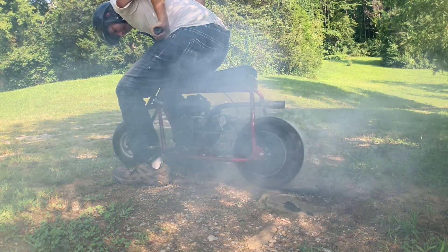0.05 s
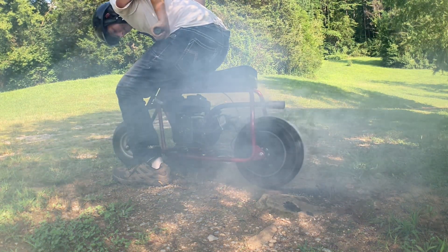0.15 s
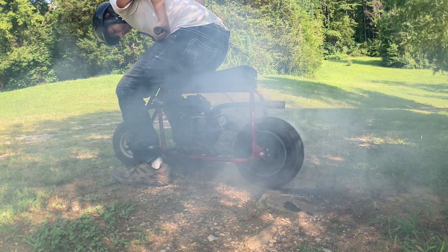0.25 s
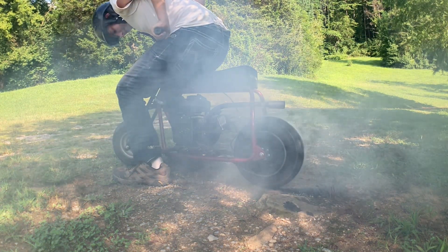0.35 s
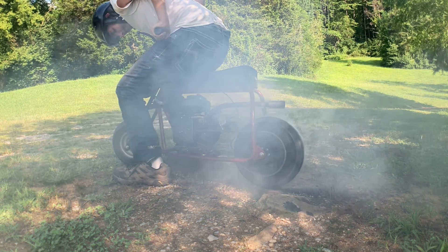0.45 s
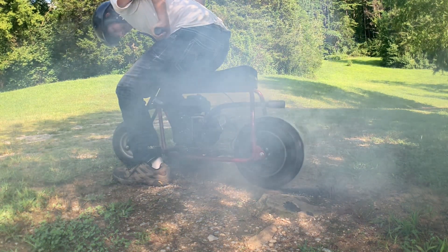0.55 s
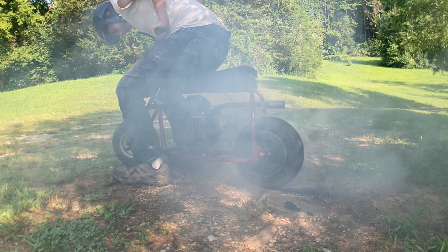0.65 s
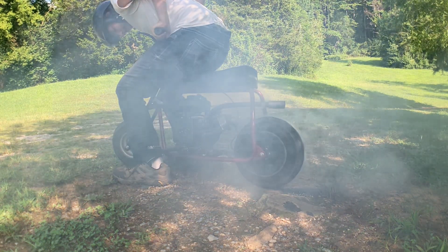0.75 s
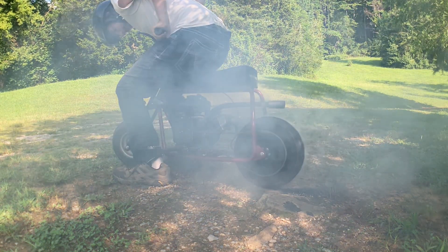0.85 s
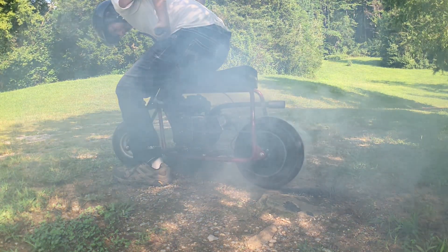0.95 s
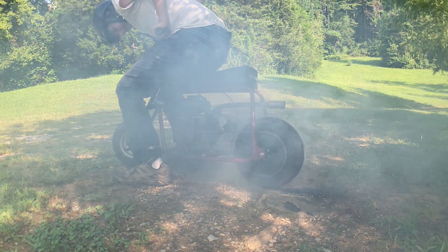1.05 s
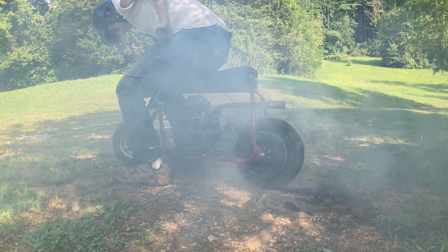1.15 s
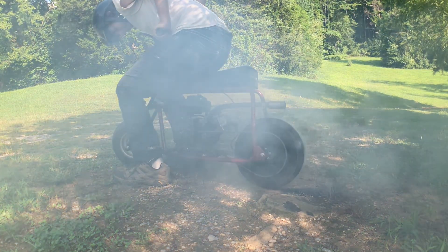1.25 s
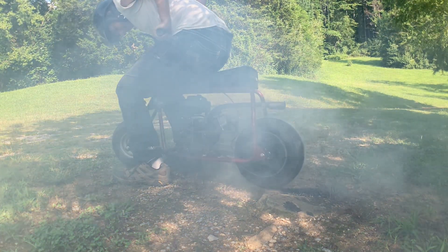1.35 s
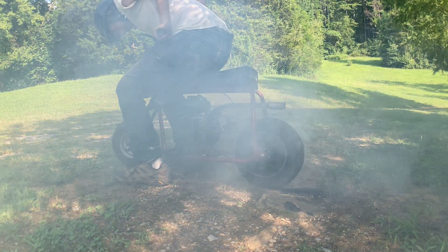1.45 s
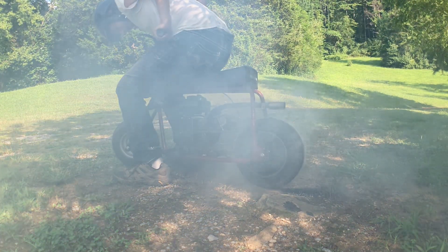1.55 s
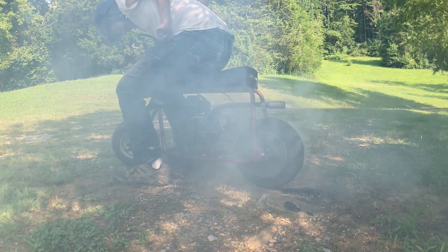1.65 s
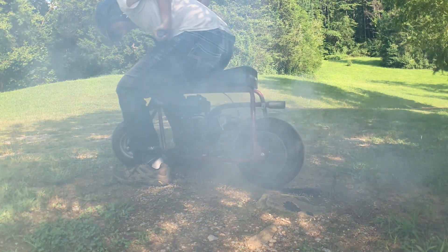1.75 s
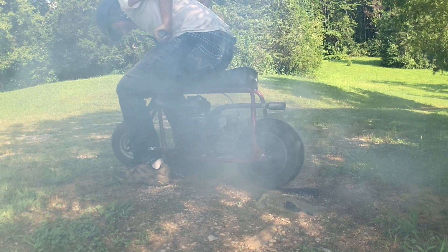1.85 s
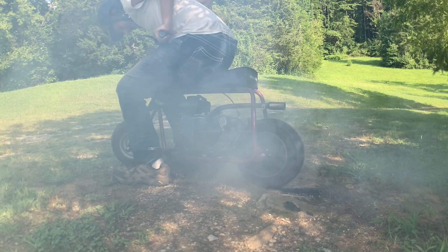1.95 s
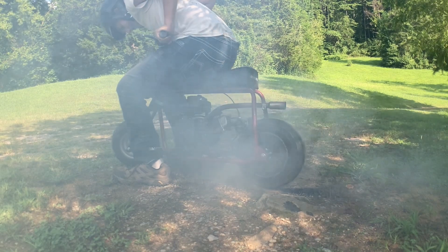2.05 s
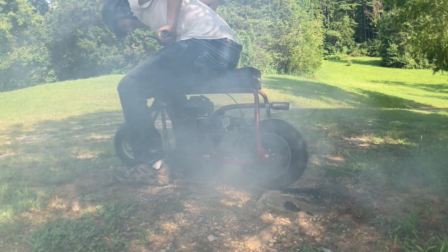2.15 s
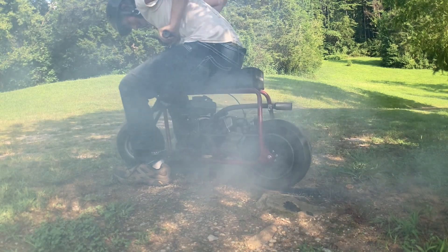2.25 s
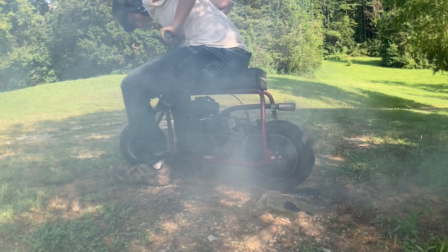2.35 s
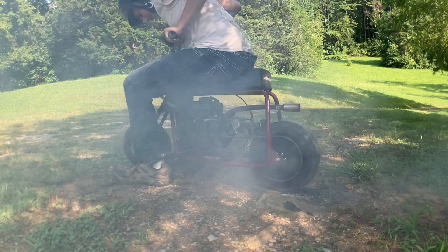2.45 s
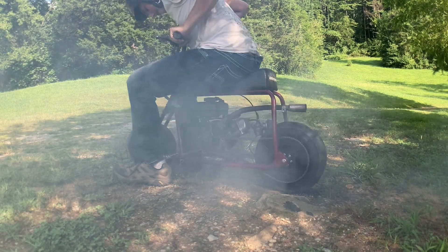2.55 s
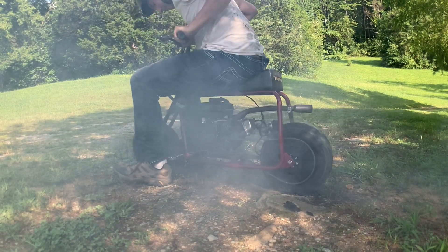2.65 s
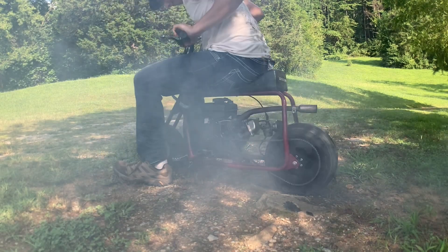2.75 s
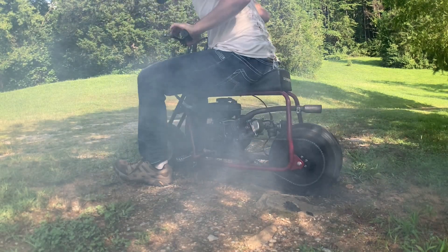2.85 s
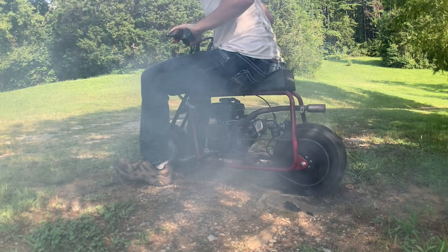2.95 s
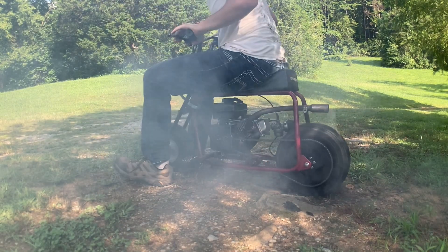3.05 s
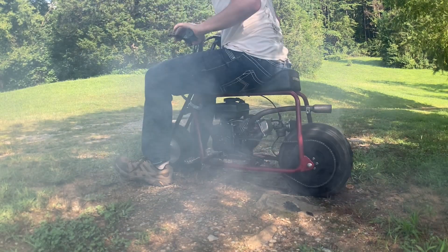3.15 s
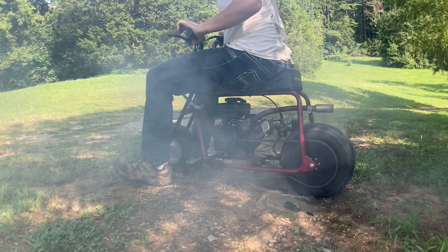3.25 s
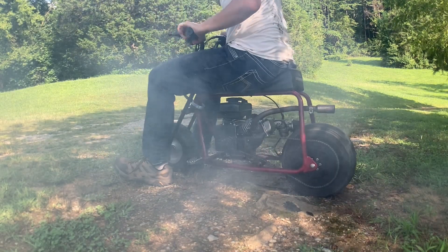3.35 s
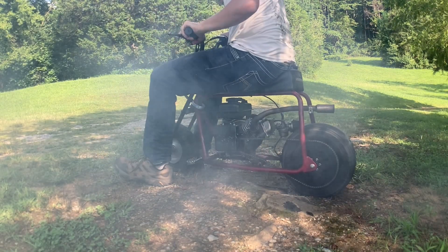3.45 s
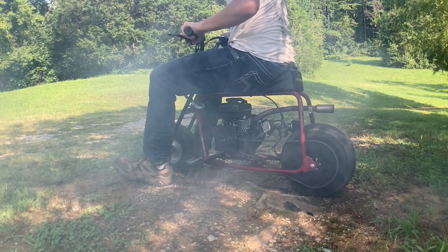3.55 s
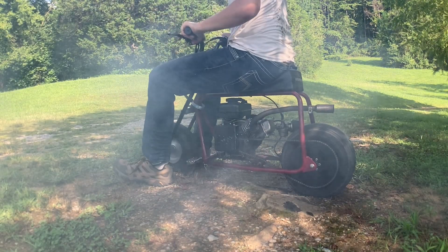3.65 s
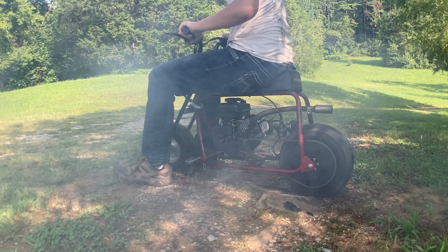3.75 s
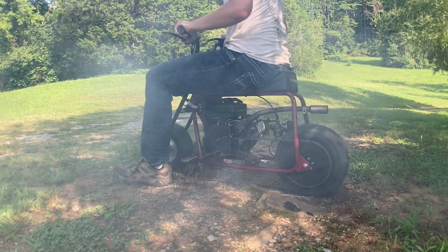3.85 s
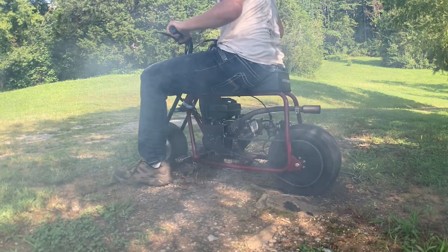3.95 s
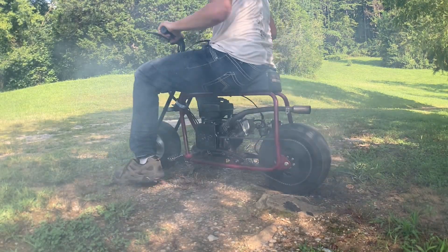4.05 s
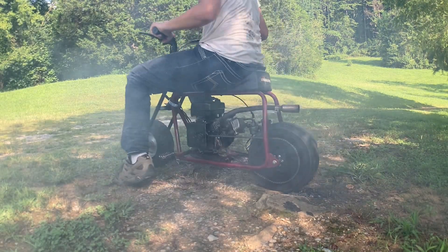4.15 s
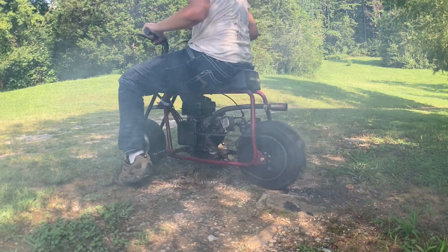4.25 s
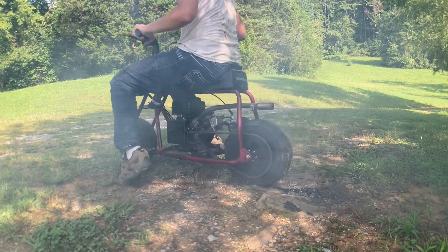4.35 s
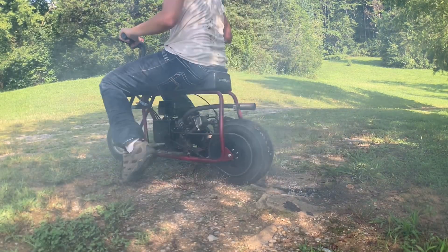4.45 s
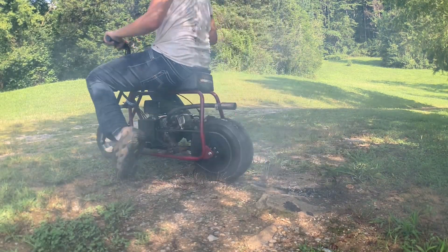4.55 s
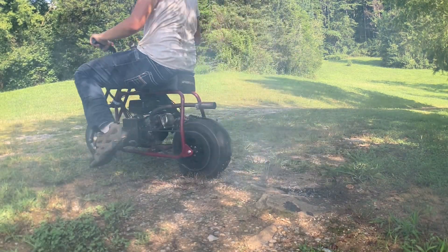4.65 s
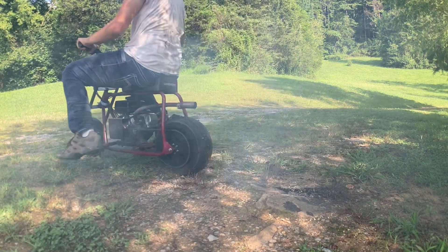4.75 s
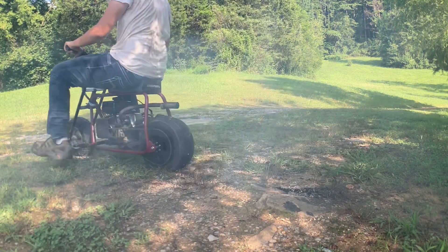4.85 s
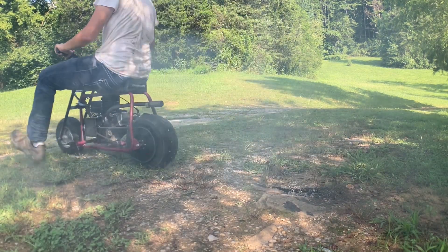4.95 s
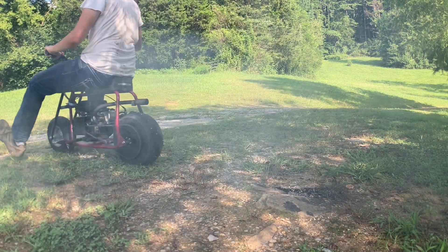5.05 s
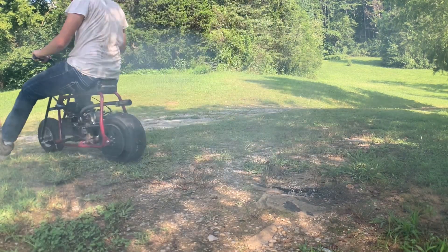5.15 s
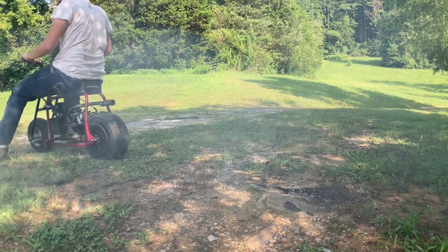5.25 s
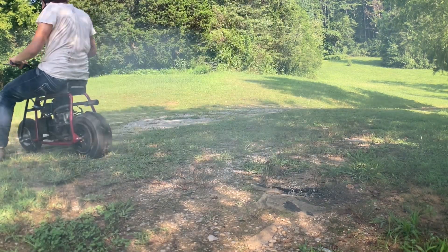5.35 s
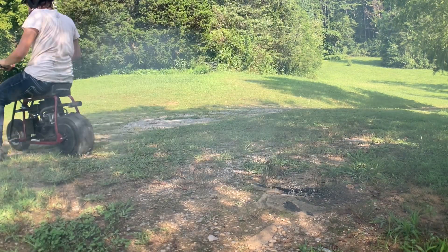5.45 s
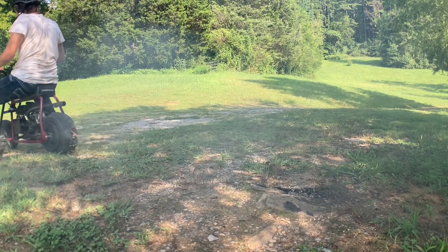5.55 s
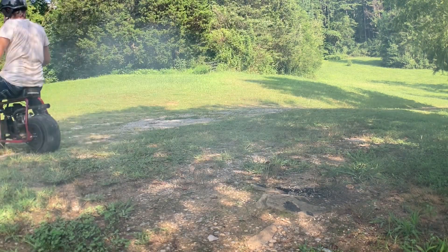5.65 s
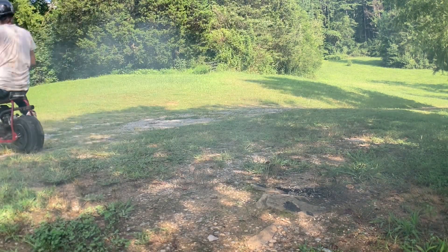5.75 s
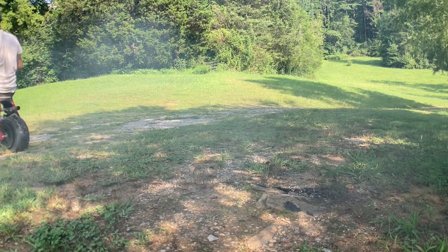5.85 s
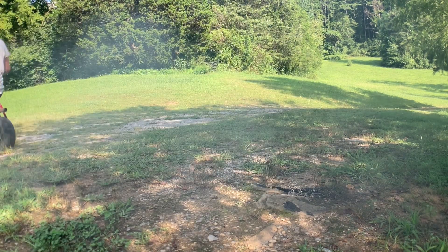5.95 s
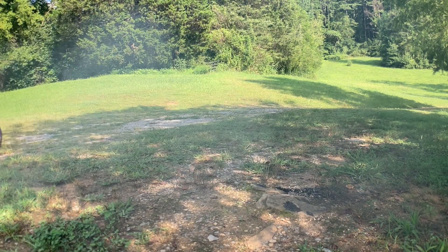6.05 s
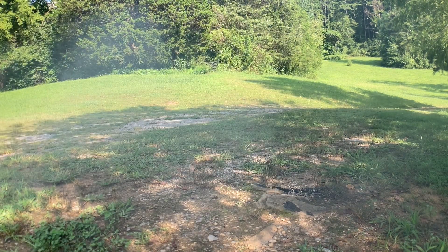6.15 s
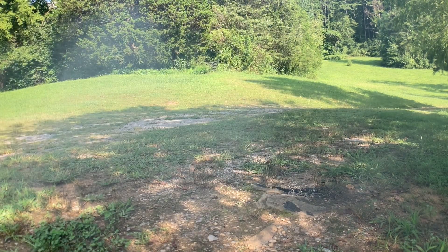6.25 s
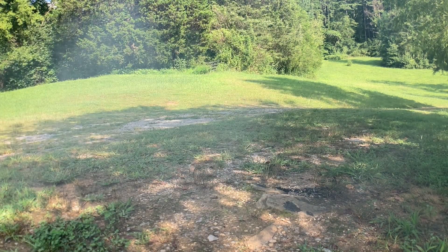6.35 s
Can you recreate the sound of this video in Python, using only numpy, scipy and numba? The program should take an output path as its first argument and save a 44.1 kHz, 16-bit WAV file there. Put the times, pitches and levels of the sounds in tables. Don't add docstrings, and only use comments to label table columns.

```python
import sys
import numpy as np
from scipy import signal
from scipy.fft import rfft, irfft
from scipy.io import wavfile
from scipy.ndimage import uniform_filter1d
from numba import njit

SR = 44100
rng = np.random.default_rng(int(sys.argv[2]) if len(sys.argv) > 2 else 0)


def decibels_to_gain(level_db):
    exponent = np.asarray(level_db, float) / 20
    return 10 ** exponent


def wrap_up_sound(samples):
    columns = np.atleast_2d(samples).T
    tamed = np.clip(columns, -1, 1)
    steps = np.round(tamed * 32767).astype(np.int16)
    wavfile.write(sys.argv[1], SR, steps)


N = 281790

# (time [s], four-stroke cycles per second [Hz])
CRANK = [(0.0, 47.817), (0.64, 49.286), (0.83, 47.98), (1.29, 25.15), (1.47, 25.909), (1.62, 23.037),
         (1.77, 23.609), (1.96, 18.861), (2.3, 14.361), (2.49, 13.153), (2.72, 13.291), (2.89, 21.66),
         (3.26, 15.823), (3.42, 23.182), (3.6, 18.657), (3.79, 23.884), (5.43, 23.543), (6.39, 22.758)]
# (frequency [Hz], width [Hz], level [dB])
CASING = [(2424, 190, -11), (2764, 112, -15), (4154, 50, -9.5), (4825, 50, -17), (5152, 75, -3.5),
          (5854, 83, -5), (7550, 370, -5.5), (8060, 350, -3), (11520, 320, -12)]
CLOSING_AT, INTAKE_AT = 0.2554, 0.5647


def exhaust(when, t):
    opens, closes, push, gulp = when(0), when(CLOSING_AT), when(0.34), when(INTAKE_AT)
    scatter = decibels_to_gain(0.32 * rng.standard_normal((4, len(opens))))

    blow_db = burn(opens)[0] + loss_db(opens)
    back_db = stroke_db(opens, (-90, 0, 0), (-11.5, 1.05))
    shut_db = stroke_db(opens, (-27, -1.1, -0.1), (-14.5, 0.4))
    push_db = stroke_db(opens, (-29.2, 4.2, 1.5), (-36, 2.5))
    gulp_db = stroke_db(opens, (-22, 1.6, 1.3), (-33, 0.6), far=1.6)
    over_gain = decibels_to_gain(stroke_db(opens, (-19, 2.7, 0.1), (-18.5, -0.5), far=-0.3))

    near_cancel = np.exp(-((columns(CRANK, opens)[0] - 27) / 5) ** 2)
    shut_db = shut_db - 13 * near_cancel * (blow_db < -80)

    blow = puff(opens, -decibels_to_gain(blow_db) * scatter[0], 0.0003)
    back = puff(opens, decibels_to_gain(back_db) * scatter[0], 0.0017)
    shut = puff(closes, decibels_to_gain(shut_db) * scatter[1], 0.0013)
    piston = puff(push, decibels_to_gain(push_db) * scatter[2], 0.00071)
    intake = puff(gulp, -decibels_to_gain(gulp_db) * scatter[3], 0.00023)

    slow = np.clip((19 - columns(CRANK, t)[0]) / 6.1, 0, 1)
    ring = svf((0.29 + 2.9 * slow) * blow + 0.39 * back + 2.74 * shut, 195.5, 25.3)
    ring = ring + svf(2.4 * intake, 340., 87.0)
    steps = clicks(opens, over_gain * (decibels_to_gain(blow_db + 30) + decibels_to_gain(back_db + 38)))
    steps = steps - clicks(gulp, over_gain * decibels_to_gain(gulp_db + 34))
    overtone = modes(steps, [(450, 26.4, 3.0), (481.3, 28, -1.5), (530, 17, -9)])
    return blow + back + shut + piston + intake + ring + overtone


def puff(times, sizes, width_s):
    # (frequency [Hz], level [dB])
    pipe_tone = [(18, -53), (30, -36.5), (80, -4), (150, -0.5), (189, -3.5), (244, -4), (340, -4),
                 (389, -13), (426, -24.5), (480, -16.5), (630, -49.5), (778, -30), (1100, -46), (1430, -45),
                 (2420, -120)]
    f = np.fft.rfftfreq(N, 1 / SR)
    hz, db = np.transpose(pipe_tone)
    bell = np.exp(-(np.pi * width_s * f) ** 2)
    shape = bell * decibels_to_gain(np.interp(np.log(f + 1), np.log(hz), db))
    return irfft(rfft(clicks(times, sizes)) * shape, N) * N / (2 * shape.sum())


def muzzle(when, t):
    # (frequency [Hz], width [Hz], level from the side [dB], level from behind [dB])
    mouth_modes = [(780, 120, -26, 4), (940, 59, -24, 7), (1304, 310, -1.5, -1), (1944, 690, 5, -11),
                   (2336, 160, -6.5, 3.5), (3020, 130, -15.5, -0.5), (3870, 260, -32, -5),
                   (4760, 600, 7, -13.5)]
    # (frequency [Hz], level [dB])
    jet_tone = [(1470, -74), (2500, -7), (4080, -4.5), (4410, -10), (5650, 5.5), (6110, 3.5), (8080, -4),
                (9080, -8.5), (12000, -2), (16000, -4)]
    opens = when(0) - 0.0024
    chance = rng.standard_normal((2, len(opens)))
    blow_db, crack_db = burn(opens)

    beam_db = 7.5 * np.exp(-((opens - 5.15) / 0.55) ** 2)
    jet_db = stroke_db(opens, (4, -1.2, -0.3), (-31, 1.4), far=0.55) + beam_db
    jet_db = jet_db + np.where(blow_db > -80, crack_db, -15)
    crack_db = np.maximum(crack_db, -56) + 0.3 * beam_db + 0.5 * loss_db(opens)

    shock = clicks(opens, decibels_to_gain(crack_db + 30.5 + 1.6 * chance[0]))
    shock = shock - clicks(opens + 0.0042, decibels_to_gain(crack_db + 28))
    shock = shock + bursts(opens, crack_db + 7, 0.012, 0.00031) * rng.standard_normal(N)
    along, far = travel(t)
    away = np.clip(0.3 + 0.6 * along / far, 0, 1)
    crack = np.zeros(N)
    for k, (hz, width, side, behind) in enumerate(mouth_modes):
        gain = (-1) ** k * decibels_to_gain(side + away * (behind - side))
        crack += gain * svf(shock * flicker(1.2, rate=12), 1. * hz, 1. * width)

    puffs = bursts(opens, jet_db + 2.5 + 1.7 * chance[1], 0.017, 0.0002)
    tails = bursts(opens, jet_db - 10, 0.09, 0.0029)
    jet = (puffs + tails) * noise(jet_tone)
    bands = [(hz, 0.09 * hz, -hz / 1500) for hz in 2300 * 1.09 ** np.arange(22)]
    eddies = modes(jet, bands, patchy_db=5.5, rate=24)
    return crack + decibels_to_gain(-6.5) * eddies + decibels_to_gain(1) * modes(jet, CASING, patchy_db=3.0, rate=9)


def burn(at):
    # (from [s], to [s], first burn [dB], last burn [dB], last crack [dB])
    throttle = [(-2, .79, 0, 0, -15.5), (.79, .84, -.5, -2.5, -21), (1.3, 1.46, -4.5, -1.5, -19.5),
                (1.46, 1.62, -5.5, -4.5, -27), (1.62, 1.79, -3, -2.5, -19), (1.79, 1.835, -4, -4, -27),
                (2.43, 2.73, -19, -12, -44), (2.73, 2.895, -12, -3, -24), (3.28, 3.45, -7.5, -2, -18),
                (3.62, 3.78, -5.5, -2, -19), (3.78, 4.8, -2, -.6, -18), (4.8, 6.5, -.1, -.1, -17)]
    start, end, first, last, crack = np.transpose(throttle)[:, :, None]
    held = first + (last - first) * np.clip((at - start) / (end - start), 0, 1)
    held = held - 250 * np.maximum(at - end, 0)
    on = (at >= start) & (at < end + 0.04)
    crack_db = crack + 1.1 * (held - last)
    return np.where(on, held, -90).max(axis=0), np.where(on, crack_db, -90).max(axis=0)


def stroke_db(at, burning, coasting, far=1.):
    power, speed = burn(at)[0], revs_db(at)
    fired = burning[0] + burning[1] * speed + burning[2] * power
    unfired = coasting[0] + coasting[1] * speed
    return np.where(power > -80, fired, unfired) + far * loss_db(at)


def revs_db(at):
    return 20 * np.log10(columns(CRANK, at)[0] / 23.7)


def travel(at):
    s = np.maximum(at - 4.7, 0)
    along = 1.2 * s + 1.3 * s ** 2 / 2
    return along, np.hypot(1, along)


def loss_db(at):
    return -20 * np.log10(travel(at)[1])


def running_gear(when, t):
    # (frequency [Hz], level [dB])
    gear_tone = [(530, -12), (900, -21), (956, -5.5), (1080, -18), (1420, -8.5), (2070, -9.5), (2600, -2.5),
                 (3550, -6), (5890, -1), (9650, -2.5), (16000, -5)]
    # (frequency [Hz], level [dB])
    idle_tone = [(410, -34), (700, -14.5), (1640, -16), (1770, -10), (2000, -9.5), (2220, -5), (3500, -13),
                 (4990, -6), (6070, -15), (7690, -12.5), (8880, -20.5), (16000, -17)]
    gear_db = hiss_db(t)
    fast = np.clip((gear_db + 43.5) / 13, 0, 1) ** 0.64
    grit = flicker(1.52, rate=300) * rng.standard_normal(N)

    taps = np.concatenate([when(0), when(CLOSING_AT), when(INTAKE_AT)])
    seat_db = np.repeat([-5, 4, -7], len(taps) // 3)
    tappet = bursts(taps, seat_db + 2.5 * rng.standard_normal(len(taps)), 0.08, 0.003)
    shake = grit * (1 + decibels_to_gain(4) * (1 - fast) * tappet)

    bands = [(hz, 0.21 * hz, 0) for hz in 800 * 1.19 ** np.arange(18)]
    patchy = modes(shake, bands, patchy_db=3.5, rate=40)
    rattle = fast * unit(colour(patchy, gear_tone)) + (1 - fast) * unit(colour(patchy, idle_tone))
    return decibels_to_gain(gear_db + 0.5) * (rattle + decibels_to_gain(-9) * modes(rattle, CASING, patchy_db=3, rate=13))


def hiss_db(t):
    spin_db = 5 * (t < 1.9)
    load = decibels_to_gain(-25 + 1.5 * burn(t)[0] + 0.7 * revs_db(t) + spin_db)
    keep = np.exp(-1 / (0.055 * SR))
    load = signal.lfilter([1 - keep], [1, -keep], load, zi=[load[0]])[0]
    free = decibels_to_gain(np.minimum(-31.5 + 2.8 * revs_db(t), -23))
    return 20 * np.log10(np.hypot(load, free)) + 1.15 * loss_db(t)


def clutch(t):
    # (frequency [Hz], width [Hz], level [dB])
    bell_modes = [(5550, 70, -10), (5800, 80, 0), (6020, 70, -7), (8330, 110, -5), (11300, 80, -3)]
    # (time [s], squeal level [dB], half length [s])
    drags = [
        (2.045, -34, .04),
        (2.84, -26, .035),
        (3.02, -37, .13),
        (3.59, -43, .06),
    ]
    # (time [s], peak level [dB], decay to -60 dB [s])
    grabs = [
        (2.7563, -5, 0.095),
        (2.8176, 1, 0.057),
        (2.8686, -1.5, 0.087),
        (3.2975, -14, 0.11),
        (3.351, 2, 0.11),
        (3.396, -10, 0.24),
        (3.688, -1, 0.085),
    ]
    bow = rng.standard_normal(N) * flicker(1.8, rate=60)
    drag = sum(decibels_to_gain(db) * np.exp(-((t - s) / half) ** 2) for s, db, half in drags)
    squeal = unit(modes(bow, bell_modes)) * drag
    jerks = sum(bursts(np.array([s]), db - 11.5, t60, 0.0013) for s, db, t60 in grabs)
    rasp = jerks * noise([(300, -34), (1000, -12), (2500, -6), (5500, -1.5), (9000, -0.5), (16000, -5.5)])
    return squeal + rasp + decibels_to_gain(1.0) * modes(rasp, bell_modes)


def block(cycles, t):
    # (frequency [Hz], level [dB])
    knock_tone = [(60, -40), (150, -11.5), (400, 0.5), (490, 0), (600, -22), (700, -13.5), (800, -12),
                  (980, -11.5), (1200, -10.5), (2000, -31)]
    place, drift = 256 * (cycles % 1), 1.45 * t
    first, second = [np.interp(place, np.arange(256), pattern, period=256)
                     for pattern in rng.standard_normal((2, 256))]
    clatter = unit(colour(np.cos(drift) * first + np.sin(drift) * second, knock_tone))
    frame = noise([(30, -40), (60, -17), (150, -8), (400, 3), (600, -12), (1200, -45)])
    work_db = uniform_filter1d(hiss_db(t) + 30, SR // 20)
    return clatter * decibels_to_gain(-40 + 0.67 * work_db) + frame * decibels_to_gain(-38 + 0.45 * work_db)


def lawn(x, t):
    along, far = travel(t)
    lag_ms = 0.71 / (1 + 0.3 * along ** 1.3)
    strength = np.clip(0.18 + 0.42 * (1 - 1 / far), 0, 1)
    soft = uniform_filter1d(x, size=3)
    return x + strength * np.interp(t - lag_ms / 1000, t, soft)


def unit(x):
    return x / np.sqrt(np.mean(x ** 2))


def columns(table, at):
    s, *rest = np.transpose(table)
    return [np.interp(at, s, c) for c in rest]


def colour(x, spectrum):
    hz, db = np.transpose(spectrum)
    log_f = np.log(np.fft.rfftfreq(N, 1 / SR) + 1)
    return irfft(rfft(x) * decibels_to_gain(np.interp(log_f, np.log(hz), db)), N)


def noise(spectrum):
    return unit(colour(rng.standard_normal(N), spectrum))


@njit
def svf(x, hz, width):
    y, band, low = np.empty(len(x)), 0., 0.
    g, k = np.tan(np.pi * hz / SR), width / hz
    for i in range(len(x)):
        v = (band + g * (x[i] - low)) / (1 + g * (g + k))
        band = 2 * v - band
        low = low + 2 * g * v
        y[i] = k * v
    return y


def modes(x, table, patchy_db=0, rate=30):
    return sum(decibels_to_gain(db) * svf(x * flicker(patchy_db, rate), 1. * hz, 1. * width) for hz, width, db in table)


def flicker(db, rate):
    step = 32
    k = max(int(SR / rate / step), 1)
    held = np.repeat(rng.standard_normal(N // step // k + 2), k)
    slewed = uniform_filter1d(uniform_filter1d(held, k), k)
    return np.repeat(decibels_to_gain(1.234 * db * slewed), step)[:N]


def clicks(times, sizes):
    at, sizes = np.clip(times * SR, 0, N - 2), sizes * (times >= 0)
    whole = at.astype(int)
    part = at - whole
    return np.bincount(whole, sizes * (1 - part), N) + np.bincount(whole + 1, sizes * part, N)


def bursts(times, db, t60_s, rise_s):
    keep = np.exp(-np.log(1000) / (t60_s * SR))
    decay = signal.lfilter([1], [1, -keep], clicks(times, decibels_to_gain(db)))
    return uniform_filter1d(decay, max(int(rise_s * SR), 1))


def scene():
    t = np.arange(N) / SR
    cycles = 0.0947 + np.cumsum(columns(CRANK, t)[0]) / SR
    firings = np.arange(-1, int(cycles[-1]) + 2)

    def when(share):
        return np.interp(firings + share, cycles, t, -1, -1)

    reflected = lawn(muzzle(when, t) + running_gear(when, t), t)
    return (exhaust(when, t) + reflected + clutch(t) + block(cycles, t))[None]


def band_limit(x):
    return signal.sosfilt(signal.butter(12, 16990, fs=SR, output="sos"), x)


def record(dry):
    jf = 1j * np.fft.rfftfreq(N, 1 / SR)
    late = irfft(rfft(dry) * ((80 - jf) / (80 + jf)) ** 7, N)
    top_cut = signal.ellip(8, 0.3, 45, 15900, fs=SR, output="sos")
    late = signal.sosfilt(top_cut, late)
    return band_limit(np.tanh(0.91 * late))


dry = scene()
out = record(dry)
wrap_up_sound(out)
```